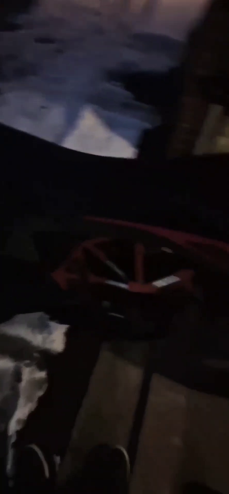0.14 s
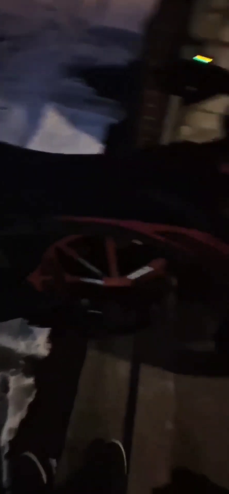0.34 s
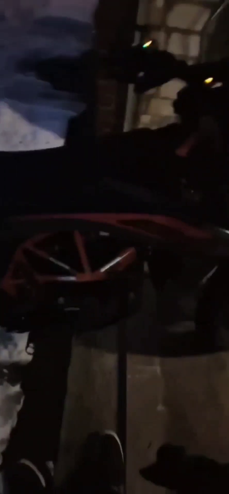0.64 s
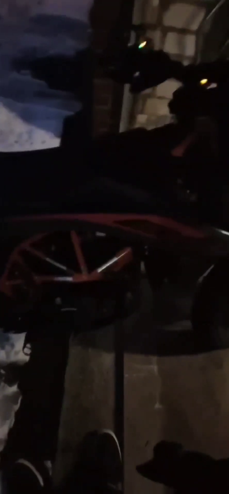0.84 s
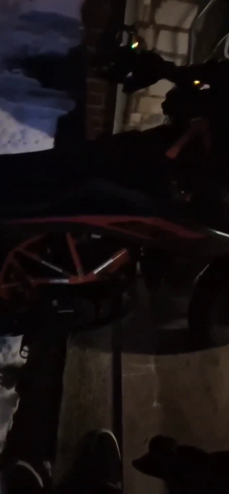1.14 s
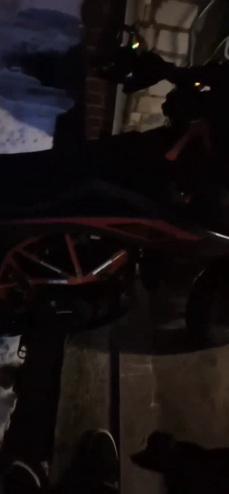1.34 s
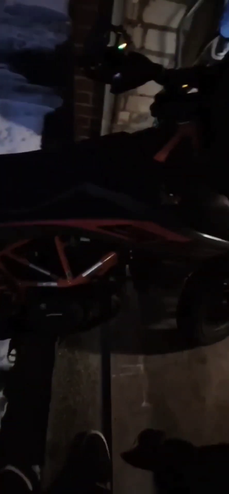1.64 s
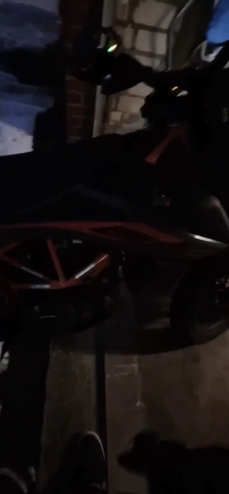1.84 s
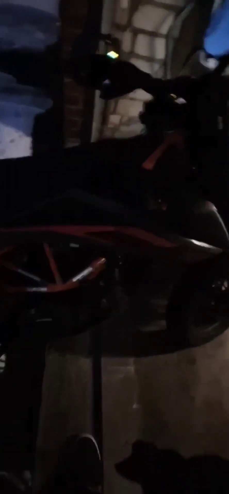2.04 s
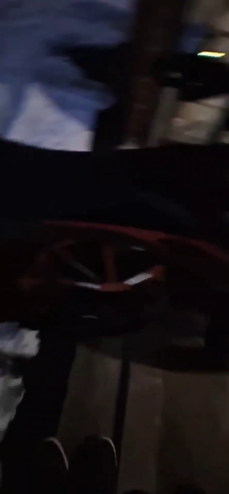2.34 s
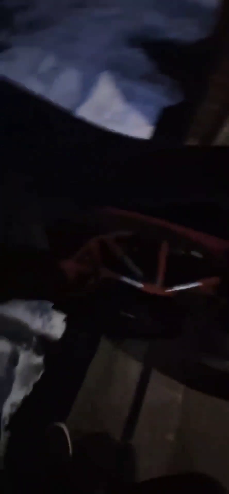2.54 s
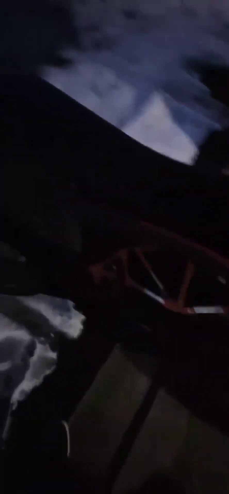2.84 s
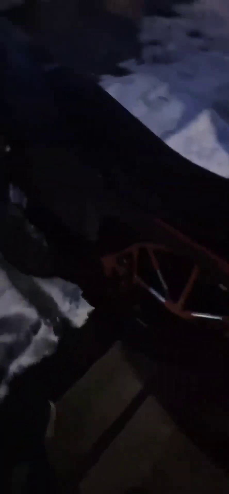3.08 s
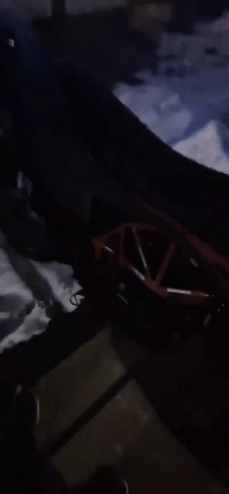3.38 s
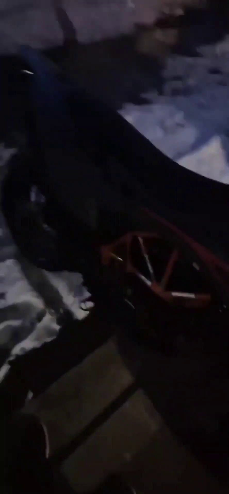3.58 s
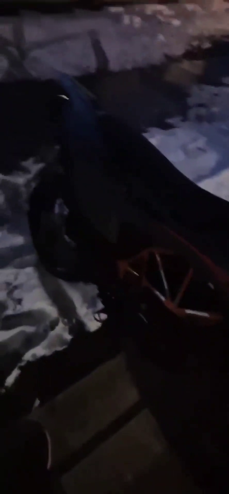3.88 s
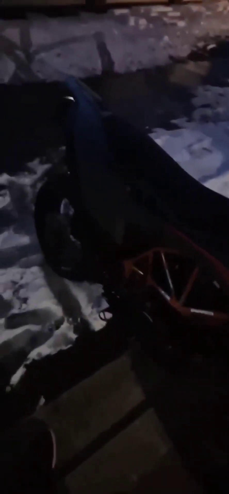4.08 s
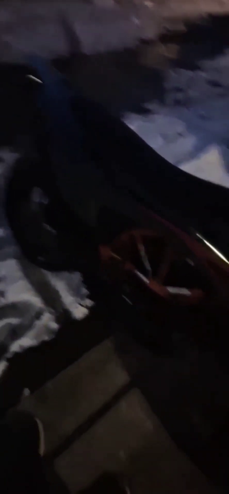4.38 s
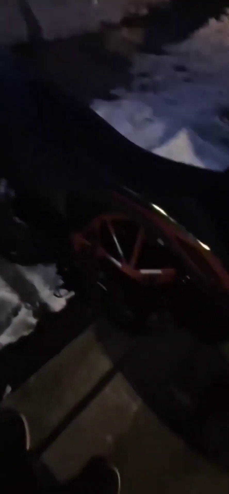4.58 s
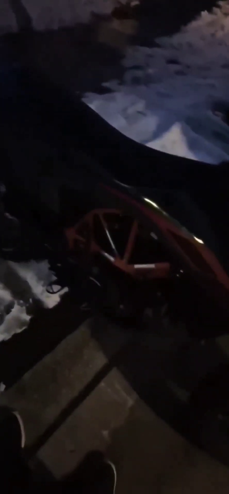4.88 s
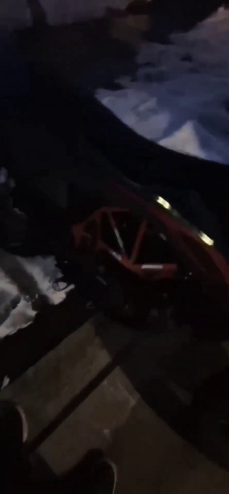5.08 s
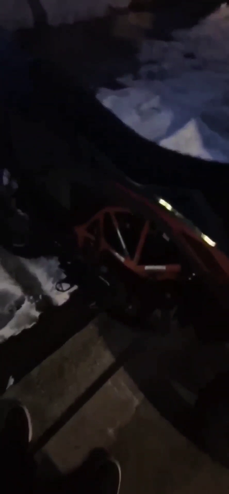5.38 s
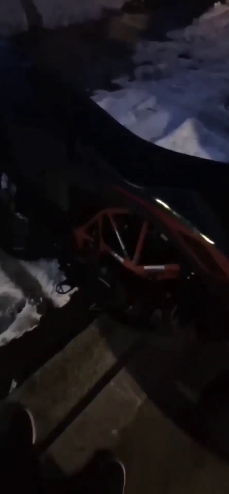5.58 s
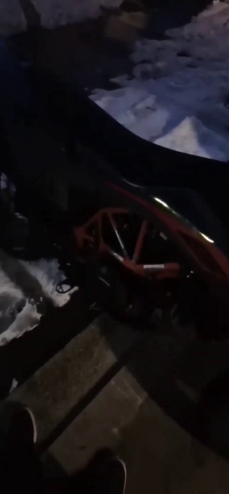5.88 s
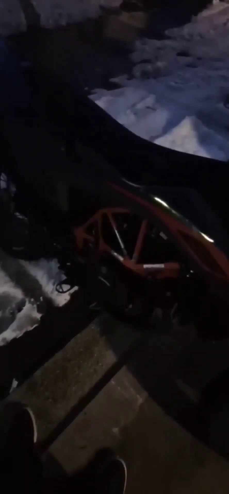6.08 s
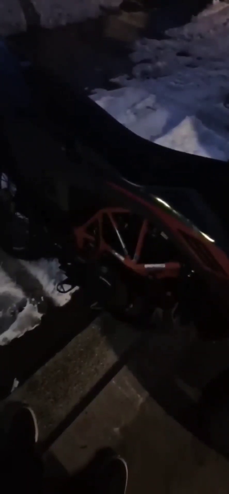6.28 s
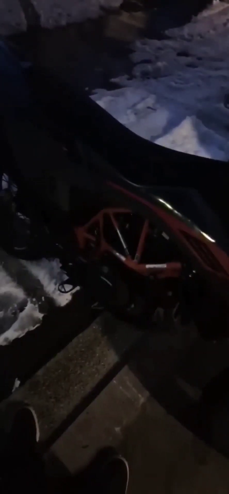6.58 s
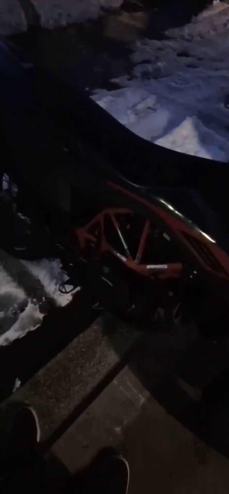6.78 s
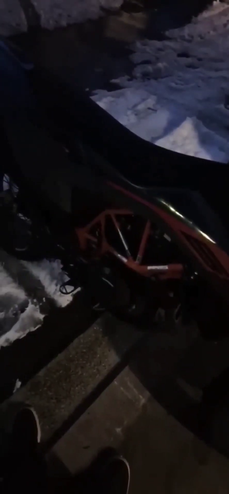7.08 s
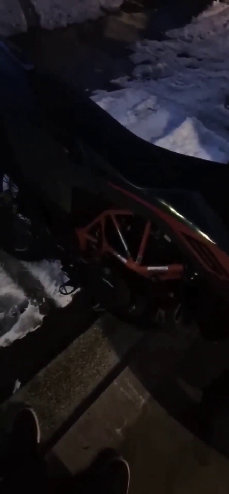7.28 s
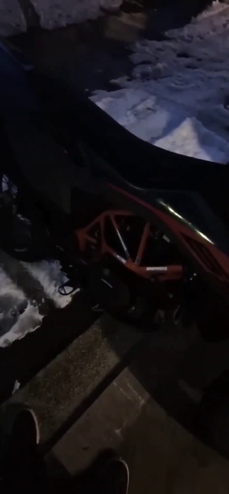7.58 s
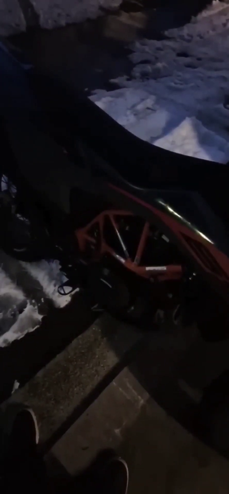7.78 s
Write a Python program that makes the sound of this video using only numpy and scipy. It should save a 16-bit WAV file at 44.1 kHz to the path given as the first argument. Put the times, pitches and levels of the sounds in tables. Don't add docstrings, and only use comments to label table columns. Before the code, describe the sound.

Outdoors at night, a starter motor grinds and chugs against compression, pauses briefly, re-engages, kicks back and keeps turning an engine that never fires.

```python
import sys
import numpy as np
from scipy import signal
from scipy.fft import rfft, irfft, next_fast_len
from scipy.io import wavfile
from scipy.ndimage import map_coordinates

SR = 44100
rng = np.random.default_rng(int(sys.argv[2]) if len(sys.argv) > 2 else 0)


def level_to_linear(level):
    exponent = np.asarray(level, float) / 20
    return 10 ** exponent


def transcribe(u):
    v = np.clip(np.atleast_2d(u).T, -1, 1)
    q = np.round(v * 32767).astype(np.int16)
    wavfile.write(sys.argv[1], SR, q)


N = 349713

# valve opens on the empty cylinder in s, delay of the last stroke in s, gas in dB,
# stretch of the tooth chatter as a factor, squeeze in dB.
CYCLES = [(-0.287, .13, 0, 1.01, 0), (0.151, .13, 0, .99, 0), (0.588, 0.13, 0, 1.01, -1),
          (1.027, .128, 0, .99, 0), (1.46, .142, -0.5, 1.01, 0), (3.935, 0.13, 0.5, .99, 0.46),
          (4.378, .13, 1, 1.01, 0), (4.874, .132, 0.66, 1.01, 0), (5.313, 0.13, 0.5, 1.01, 0),
          (5.755, 0.13, 0.2, 1.01, 0), (6.196, .131, 0.3, .99, -0.26), (6.629, .13, 0, .99, .5),
          (7.061, .151, -0.7, 1.1, -1), (7.528, .126, -.6, .97, -2), (7.94, .13, 0, 1.01, 0)]


def unit(x):
    return x / np.sqrt(np.mean(x ** 2) + 1e-20)


def along(points, hz):
    f, v = np.transpose(points)
    return np.interp(np.log(hz + 1), np.log(f + 1), v)


def curves(rows):
    s, *cols = np.transpose(rows)
    t = np.arange(N) / SR
    gate = (t >= s[0]) & (t <= s[-1])
    return [np.interp(t, s, c) for c in cols] + [gate]


def wobble(rate_hz):
    knots = rng.standard_normal(int(N * rate_hz / SR) + 4)
    return map_coordinates(knots, [np.arange(N) * rate_hz / SR])


def filtered(x, response):
    m = next_fast_len(N + SR // 2)
    return irfft(rfft(x, m) * response(np.fft.rfftfreq(m, 1 / SR)), m)[..., :N]


def pair(response):
    m = next_fast_len(N)
    re, im = rng.standard_normal((2, 2, m // 2 + 1))
    spectrum = (re + 1j * im) * response(np.fft.rfftfreq(m, 1 / SR))
    return unit(irfft(spectrum, m)[:, :N])


def peaks(modes):
    def gain(f):
        return np.sqrt(sum(level_to_linear(db) ** 2 / (1 + ((f - hz) / (w / 2)) ** 2) ** 2 for hz, w, db in modes))
    return gain


def fuzzy(hz, width_hz):
    phase = 2 * np.pi * np.cumsum(hz) / SR
    slow = peaks([(0.0072, width_hz, 0)])
    return pair(slow) * np.cos(phase) + pair(slow) * np.sin(phase)


def tone(hz, db):
    level = level_to_linear(db + 2.5 + 1.8 * wobble(25.05))
    phase = 2 * np.pi * np.cumsum(hz + 8 * wobble(29.9)) / SR
    return [[1], [.5]] * level * np.sin(phase)


def ring(hz, width_hz, rise_s):
    t = np.arange(SR // 4) / SR
    return np.exp(-np.pi * width_hz * t) * (1 - np.exp(-t / rise_s)) * np.sin(2 * np.pi * hz * t)


def bursts(times_s, levels_db, t60s, rise_s):
    power = np.zeros(N + SR)
    t = np.arange(SR // 2) / SR
    for s, db, t60 in zip(times_s, levels_db, t60s):
        burst = level_to_linear(db - 60 * t / max(t60, .02)) * (1 - np.exp(-t / rise_s))
        power[round(s * SR):][:len(t)] += burst ** 2
    return np.sqrt(power[:N])


def night():
    # frequency in Hz, density in dB per Hz.
    night_colour = [(20, -12), (70, 1.5), (217, -10), (800, -15.5), (2160, -30), (7000, -41), (8400, -54),
                    (10000, -43.5)]
    level_db = -47.5
    drift = level_to_linear(wobble(3.015) + wobble(7.3))
    return level_to_linear(level_db) * drift * pair(lambda f: level_to_linear(along(night_colour, f)))


def even(rows):
    # start in s, end in s of a span of even turning.
    even_spans = [
        (-0.07, 1.55),
        (3.8, 4.375),
        (4.75, 7.925),
    ]
    return [row for row in rows if any(a <= row[0] <= b for a, b in even_spans)]


def strokes():
    # first pipe mode in dB, second mode in dB, flutter in dB.
    stroke_levels = [
        (-21.5, -19.5, -32.5),
        (-13.5, -6.5, -23),
        (-7.5, -35, -35),
    ]
    # first mode in dB, second mode in dB, snap in dB.
    suction_levels = (-10, -8, -16)
    # start in s, first mode in dB, second mode in dB, flutter in dB.
    odd_puffs = [
        (1.609, -11.5, -52, -33.4),
        (3.091, -10, -20, -25),
        (3.217, -11, -24, -32),
        (3.47, -18.5, -20.5, -36),
        (3.6, -9.5, -26, -39),
        (4.551, -7.5, -28, -32.5),
    ]
    # start in s, first mode in dB, second mode in dB, snap in dB.
    odd_pops = [
        (4.378, -6, -11, -17.5),
        (4.461, -10, -10, -27),
    ]
    lead_s = .083
    puffs, pops = [], []
    for s, last_s, gas_db, _, _ in CYCLES:
        for late_s, levels in zip((-lead_s, last_s / 2, last_s), stroke_levels):
            puffs.append((s + late_s, *np.add(levels, gas_db)))
        pops.append((s, *np.add(suction_levels, gas_db)))
    return even(puffs) + list(odd_puffs), even(pops) + list(odd_pops)


def exhaust():
    # frequency in Hz, width in Hz.
    pipe_modes = [(54, 11.3), (91, 8.65)]
    # frequency in Hz, width in Hz, level in dB.
    snap_modes = [(167, 35.7, 1.5), (246, 19.7, -2.5), (345, 19.3, -10.5), (450, 42, -17)]
    out = np.zeros(N + SR)
    puffs, pops = strokes()
    first, second = (ring(hz, w, rise_s=0.0028) for hz, w in pipe_modes)
    snap = sum(sign * level_to_linear(db) * ring(hz, w, rise_s=0.00085)
               for sign, (hz, w, db) in zip((1, 1, -1, 1), snap_modes))
    for s, first_db, second_db, _ in puffs:
        out[round(s * SR):][:len(first)] += level_to_linear(second_db) * second - level_to_linear(first_db) * first
    for s, first_db, second_db, snap_db in pops:
        out[round(s * SR):][:len(first)] += level_to_linear(first_db) * first - level_to_linear(second_db) * second
        out[round((s - .003) * SR):][:len(snap)] += level_to_linear(snap_db + 5.5) * snap
    s, _, _, flutter_db = np.transpose(puffs)
    flutter = bursts(s - .005, flutter_db, np.full(len(s), .25), rise_s=0.0025)
    return out[:N] + flutter * pair(peaks([(156.0, 205, -0.83), (244.0, 65, -0.17)]))[0]


def rasp():
    # frequency in Hz, width in Hz, level in dB.
    silencer_modes = [(379, 215, -8), (703, 160, -1.5), (820, 120, -5), (1020, 520, -13.5)]
    strongest_db, growth, sucked_db, t60_s = -26.5, .4, -3, .42
    puffs, pops = strokes()
    s, _, second_db, _ = np.transpose(puffs + pops)
    sucked = np.arange(len(s)) >= len(puffs)
    db = strongest_db + growth * (second_db + 7) + sucked_db * sucked
    gas = bursts(s - .006, db, np.full(len(s), t60_s), rise_s=0.007)
    return gas * level_to_linear(3.13 * wobble(70)) * pair(peaks(silencer_modes))


def loads():
    # time after the suction in s, grind in dB, rise in s, fall in s, tooth mesh in Hz.
    snatches = [(-.068, -24, .011, .017, 1390), (-.044, -22.5, .014, .026, 1270),
                (-.01, -34, .014, .055, 1320)]
    middles = [(.058, -26.5, .005, .008, 1340), (.071, -25, .005, .009, 1320),
               (.086, -31.5, .007, .022, 1310)]
    # time after the first bounce in s, grind in dB, fall in s, tooth mesh in Hz.
    chatters = [(0, -24, .012, 1490), (.025, -27.5, .013, 1420), (.051, -30, .014, 1400)]
    bites = [(.082, -28, .011, 1410), (.106, -23, .013, 1380), (.131, -23, .008, 1200),
             (.147, -27, .014, 1170)]
    # time after the first bounce in s, grind in dB, rise in s, fall in s, mesh in Hz.
    squeeze = (.12, -24, .04, .03, 1250)
    # start in s, grind in dB, tooth mesh in Hz.
    odd_chatter = [(3.19, -23.5, 1170), (3.58, -24, 1150)]
    # time in s, grind in dB, rise in s, fall in s, tooth mesh in Hz.
    odd_surges = [(2.837, -29, .022, .059, 1150), (2.899, -27, .03, .058, 1120),
                  (2.974, -23, .012, .026, 1170), (3.01, -23.5, .016, .04, 1110),
                  (3.106, -20.5, 0.0071, .044, 1350), (3.33, -28, .04, .03, 1300),
                  (3.391, -20.5, .04, .027, 1150), (3.479, -24, .008, .02, 1300),
                  (3.51, -21.5, .012, .03, 1220), (3.72, -27, .04, .03, 1300),
                  (3.772, -20, .036, .03, 1160), (4.473, -27, .007, .014, 1500),
                  (4.493, -18.5, .005, .015, 1400), (4.558, -24, .01, .0085, 1400),
                  (4.583, -27.5, .012, .05, 1200), (4.675, -30, 0.047, .03, 1340),
                  (4.715, -20.5, .035, .024, 1170)]
    usual_last_s, first_bounce_s = .131, .151
    rise_s, bounce_s, bounce_fall_s = .0095, .0237, .017
    rows = []
    for s, last_s, _, stretch, squeeze_db in CYCLES:
        slip_s = last_s - usual_last_s
        bounce = s + first_bounce_s + .3 * slip_s
        rows += [(s + late, *rest) for late, *rest in snatches]
        rows += [(s + late + slip_s, *rest) for late, *rest in middles]
        rows += [(bounce + stretch * late, db, rise_s, *rest) for late, db, *rest in chatters]
        rows += [(bounce + stretch * late, db + squeeze_db, rise_s, *rest) for late, db, *rest in bites]
        rows += [(bounce + stretch * squeeze[0], squeeze[1] + squeeze_db, *squeeze[2:])]
    odd = [(s + k * bounce_s, db, rise_s, bounce_fall_s, hz) for s, db, hz in odd_chatter for k in range(5)]
    return even(rows) + odd + list(odd_surges)


def running(db, start_db, linger_s, fall_db):
    stop_s, start_s, settle_s = 1.575, 2.799, 0.18
    t = np.arange(N) / SR
    dying = db - fall_db * np.maximum(t - stop_s - linger_s, 0)
    settling = db + start_db * np.exp(-np.abs(t - start_s) / settle_s)
    return np.where(t < start_s, dying, settling)


def starter():
    # frequency in Hz, density in dB per Hz.
    grind_colour = [(600, -20.5), (950, -9.5), (1400, -3), (1730, -4), (2300, -2), (2900, -8.5),
                    (3250, -11), (5400, -15), (5900, -20), (8700, -23.5), (9300, -20), (12500, -19),
                    (14500, -22), (15500, -33)]
    # frequency in Hz, width in Hz, level in dB.
    casing_modes = [(1100, 43, -0.5), (1400, 270, -1.5), (1927, 176, 0.5), (2340, 240, 1), (2740, 90, 4.5),
                    (2972, 80, 0), (4290, 1400, -10), (5100, 580, -9)]
    sizzle_modes = [(9460, 300, -2.5), (10170, 760, 1.5), (11140, 1100, -0.5), (13000, 1500, -4)]
    hum_modes = [(252, 64, 0.5), (571, 80, -6), (687, 126, -6)]
    # multiple of the mesh rate, level in dB.
    mesh_partials = [(1, -1.5), (2, -0.5), (3, -4.5), (4, -3)]
    # tooth mesh in Hz, whine over grind in dB.
    singing = [(1120, -3.5), (1220, -4.5), (1320, -11), (1410, -7), (1490, -3.5)]
    droop_per_s, stall_hz = 22, 1054
    labour_db, heat_s = 1.6, .009
    sudden_s = .0295

    grind, whine, pitch = np.full(N, 1e-10), np.zeros(N), np.full(N, 1300e-10)
    t = np.arange(N) / SR
    rows = loads()
    for s, db, rise_s, fall_s, mesh_hz in rows:
        near = slice(max(round((s - .2) * SR), 0), round((s + .2) * SR))
        u = t[near] - s
        edge = 2 if rise_s > sudden_s else 7
        rising = 2 * np.abs(u / max(rise_s - .003, .002)) ** edge + 14 * np.abs(u)
        falling = 2 * (u / fall_s) ** 2
        power = level_to_linear(2 * db) * np.exp(-np.where(u < 0, rising, falling))
        grind[near] += power
        whine[near] += power * level_to_linear(2 * along(singing, mesh_hz))
        sag = np.exp(-droop_per_s * np.maximum(u, -.03))
        pitch[near] += power * (stall_hz + (mesh_hz - stall_hz) * sag)
    mesh = pitch / grind

    def colour(f):
        return level_to_linear(along(grind_colour, f))

    casing = peaks(casing_modes)

    def casing_gain(f):
        return level_to_linear(5) * np.hypot(casing(f), level_to_linear(-11)) / (1 + (f / 5600) ** 16)

    song = sum(level_to_linear(db) * fuzzy(k * mesh, width_hz=44 * k) for k, db in mesh_partials)
    out = filtered(np.sqrt(whine) * level_to_linear(1.7 * wobble(70)) * song, casing_gain)

    teeth = level_to_linear(1.4 * wobble(40) + 1.4 * wobble(220))
    scrape = np.sqrt(np.maximum(grind - 1.37 * whine, 0.18 * grind))
    out += level_to_linear(-2) * scrape * teeth * pair(colour)
    out += level_to_linear(-4.5) * np.sqrt(grind) * teeth * pair(casing)

    keep = np.exp(-1 / (heat_s * SR))
    lagging = signal.lfilter([1 - keep], [1, -keep], grind)
    labour = level_to_linear(labour_db * (1300 - np.maximum(mesh, 1190)) / 100)
    sizzle = lagging ** .62 * labour
    out += level_to_linear(-7) * sizzle * teeth * pair(peaks(sizzle_modes))

    s, db, rise_s = np.transpose(rows)[:3]
    sudden = rise_s < sudden_s
    slap_s = (s - 0.81 * rise_s + 0.0024)[sudden].clip(0)
    slap = bursts(slap_s, db[sudden] - 17.5, np.full(sudden.sum(), .09), rise_s=0.00085)
    out += slap * pair(lambda f: colour(f) * f / 4000)

    hiss_db = running(-34, start_db=1.5, linger_s=-0.04, fall_db=105)
    hum_db = running(-40, start_db=4, linger_s=.15, fall_db=130)
    rumble_db = running(-37, start_db=-11, linger_s=.14, fall_db=90)
    out += level_to_linear(hiss_db + 2.7 * wobble(30)) * pair(lambda f: colour(f) / np.hypot(1, f / 9000))
    out += level_to_linear(hum_db + 3.6 * wobble(25)) * pair(peaks(hum_modes))
    return out + level_to_linear(rumble_db + 2.5 * wobble(12)) * pair(peaks([(57.4, 58, 0)]))


def relay():
    # time in s, peak in dB, treble in dB, t60 in s.
    contacts = [
        (1.645, -7, -30, 0.047),
        (1.669, -17.5, -27, 0.13),
        (2.224, -32.5, -27, 0.13),
        (2.798, -21, -12, 0.1),
    ]
    # frequency in Hz, width in Hz, level in dB.
    clack_modes = [(900, 340, -6), (1150, 200, 1), (1530, 140, 6), (2080, 370, -3.5), (2720, 600, -6),
                   (3720, 710, -11.5), (4760, 980, -16)]
    s, peak_db, treble_db, t60 = np.transpose(contacts)
    body = bursts(s, peak_db - 10, t60, rise_s=0.00097) * pair(peaks(clack_modes))
    treble = bursts(s, peak_db + treble_db + 2.5, t60 * 0.25, rise_s=0.0012)
    return body + treble * pair(peaks([(6900, 7300, 0)]))


def whines():
    # time in s, pitch in Hz, level in dB.
    coast_rows = [(1.7, 1650, -60), (1.85, 1530, -59), (2.02, 1400, -70)]
    # time in s, whine in Hz, level in dB.
    pump_rows = [(2.05, 1800, -85), (2.2, 2025, -72), (2.45, 2170, -60), (2.63, 2340, -67),
                 (2.8, 2526, -84)]
    # time in s, lower in Hz, lower in dB, upper in Hz, upper
    # in dB.
    falling_rows = [(2.02, 6300, -86, 8000, -100), (2.15, 6200, -74, 7950, -95),
                    (2.4, 5750, -75, 7790, -78), (2.55, 5505, -79, 7730, -73), (2.8, 5100, -90, 7500, -75)]
    hz, db, on = curves(coast_rows)
    out = on * level_to_linear(db) * fuzzy(hz, width_hz=50)
    hz, db, on = curves(pump_rows)
    out += on * (tone(hz, db) + tone(2 * hz, db - 14))
    low_hz, low_db, high_hz, high_db, on = curves(falling_rows)
    return out + on * (level_to_linear(low_db) * fuzzy(low_hz, width_hz=90) + tone(high_hz, high_db))


def scene():
    # frequency in Hz, left-right likeness from 0 to 1.
    likeness = [(60, 0.99), (180, .997), (550, 0.9), (1200, 0.5), (2600, 0.6), (6000, 0.3), (15000, 0.05)]
    # frequency in Hz, left over right in dB.
    left_lean = [(110, 0), (200, -.5), (380, -2), (700, -4), (1290, -3), (2380, 3), (4400, 4), (8120, 5),
                 (15000, 6.5)]

    def mid_side(hz):
        angle = np.arccos(np.clip(along(likeness, hz), 0, .999)) / 2
        return np.array([np.cos(angle), np.sin(angle)])

    mid, side = filtered(night() + rasp() + starter() + relay() + whines(), mid_side)
    gas = exhaust()
    late_gas = np.pad(gas, (2, 0))[:N]
    both = np.array([mid + side, mid - side]) + [gas, late_gas]
    return filtered(both, lambda hz: level_to_linear(np.outer([.5, -.5], along(left_lean, hz))))


def band_limit(x):
    return signal.sosfilt(signal.butter(12, 15680, fs=SR, output="sos"), x)


def record(dry):
    top_hz = 15350
    mix = filtered(dry, lambda hz: hz < top_hz)
    return band_limit(mix)


dry = scene()
out = record(dry)
transcribe(out)
```